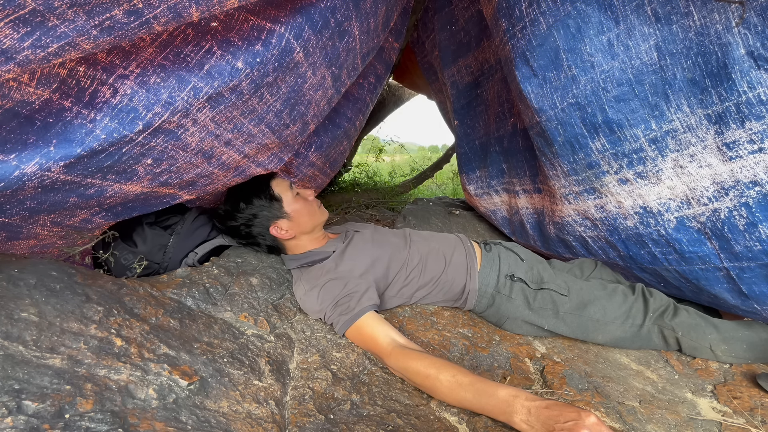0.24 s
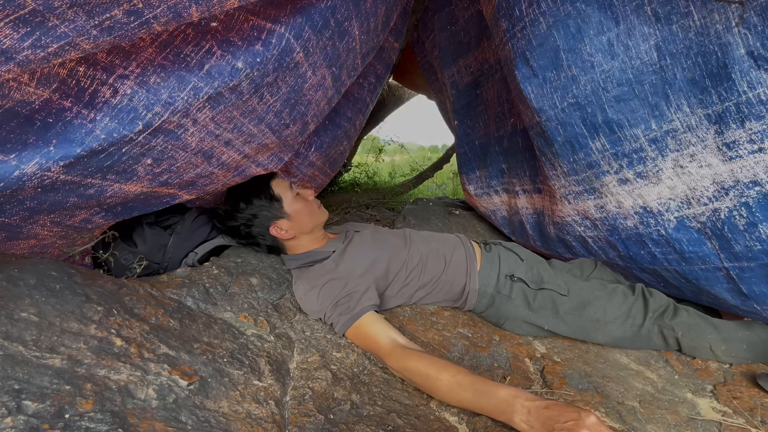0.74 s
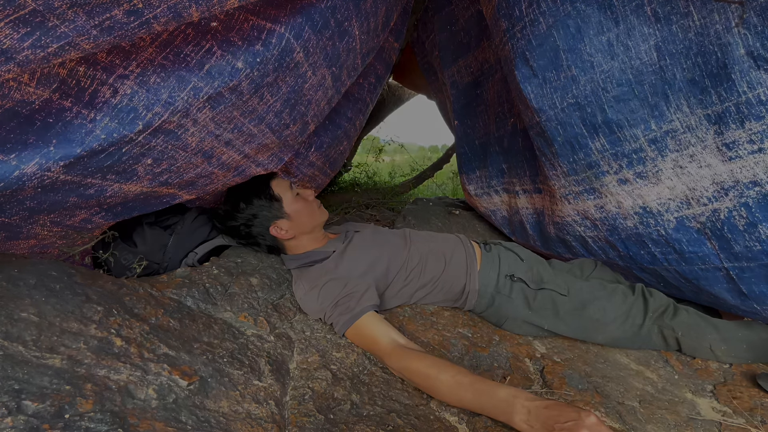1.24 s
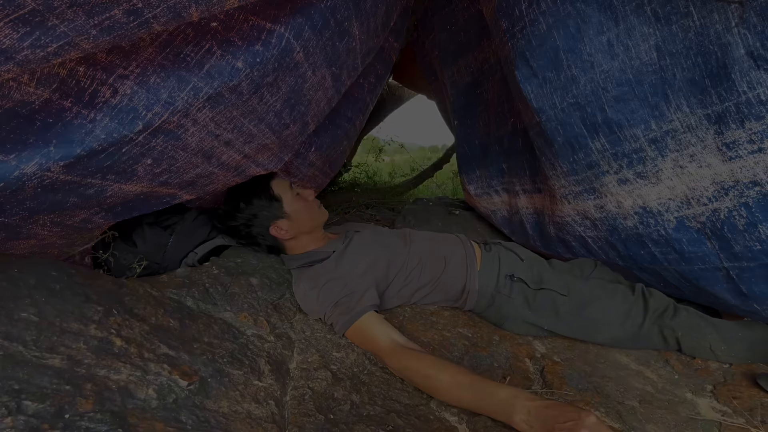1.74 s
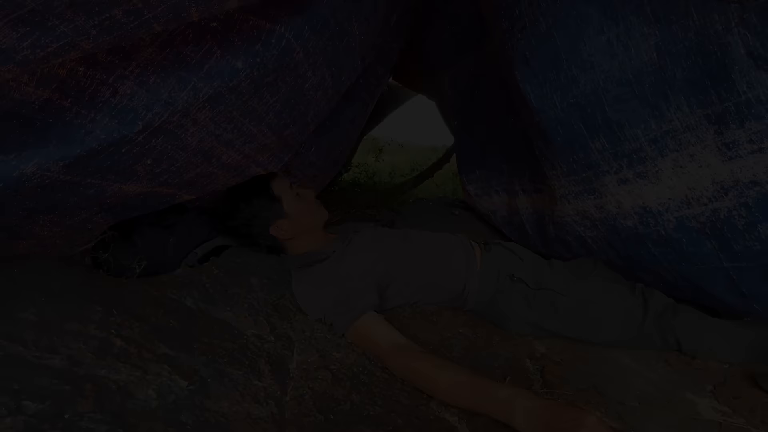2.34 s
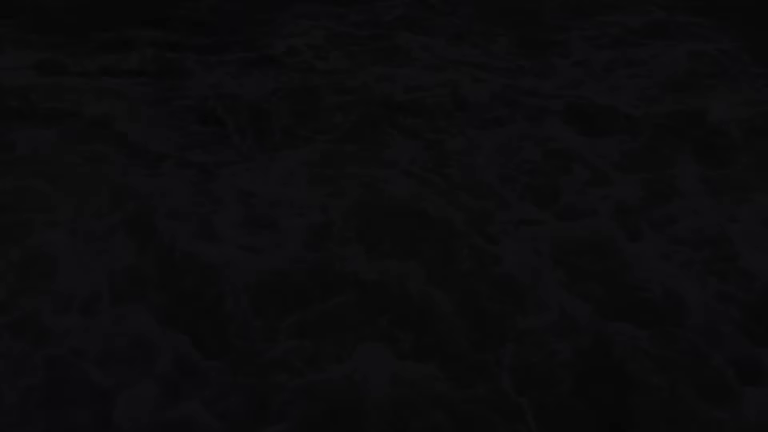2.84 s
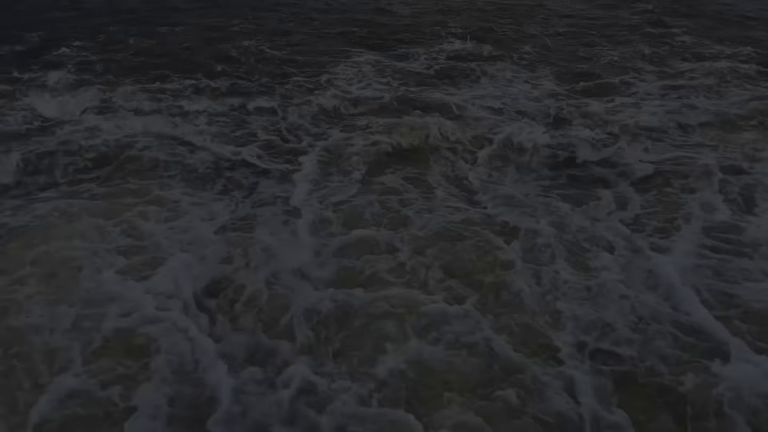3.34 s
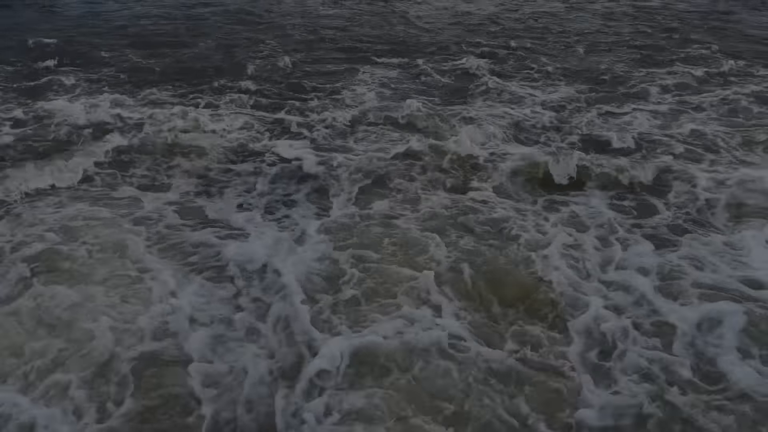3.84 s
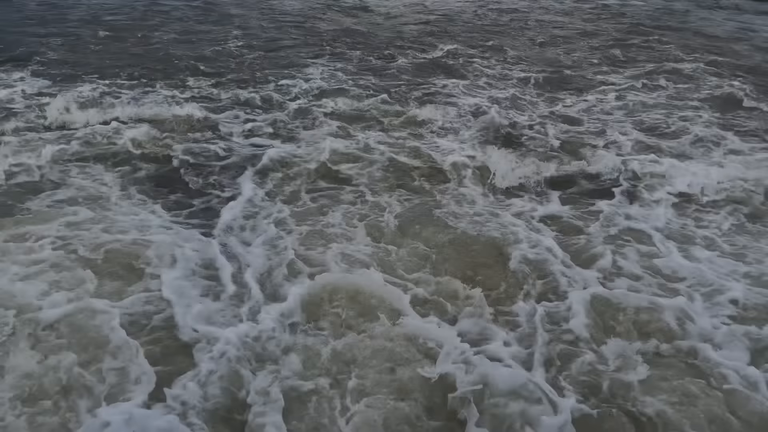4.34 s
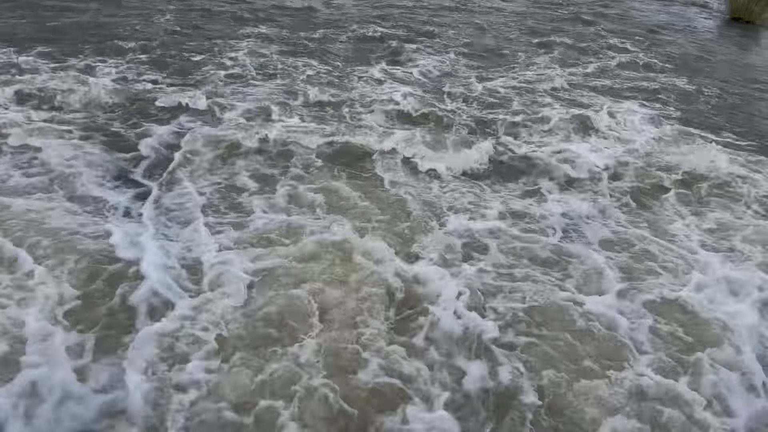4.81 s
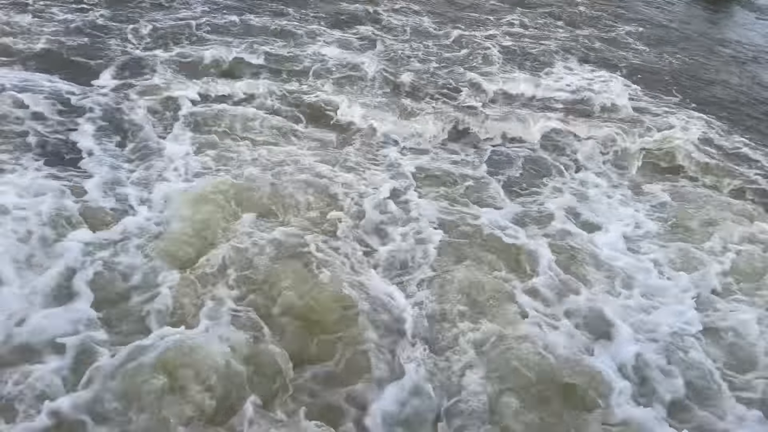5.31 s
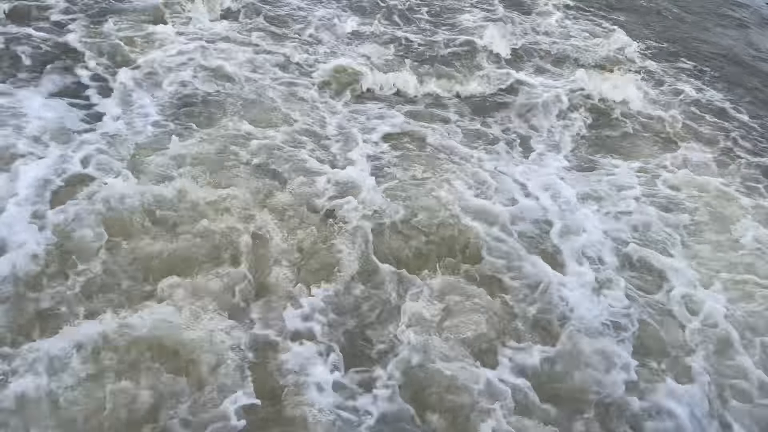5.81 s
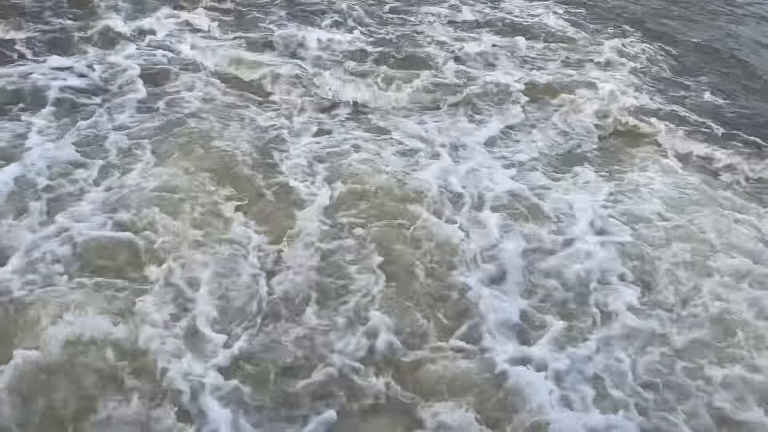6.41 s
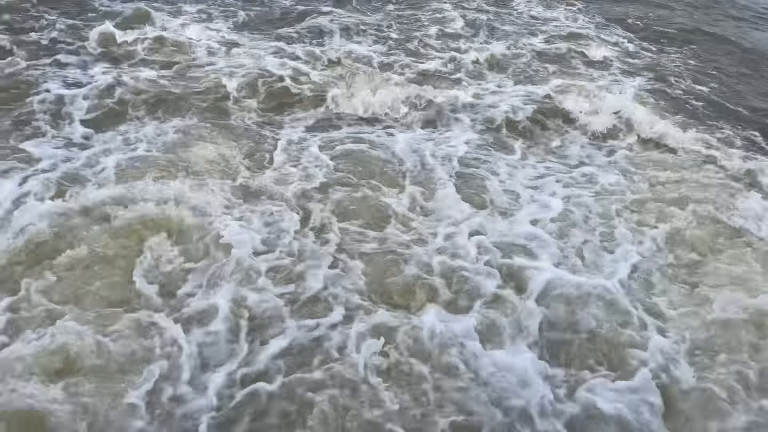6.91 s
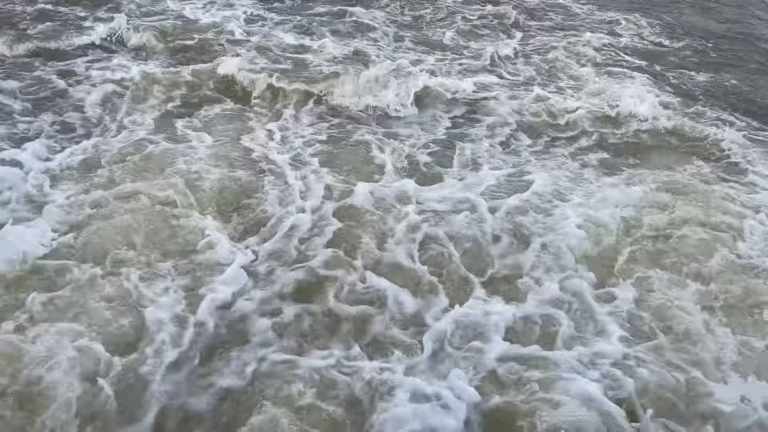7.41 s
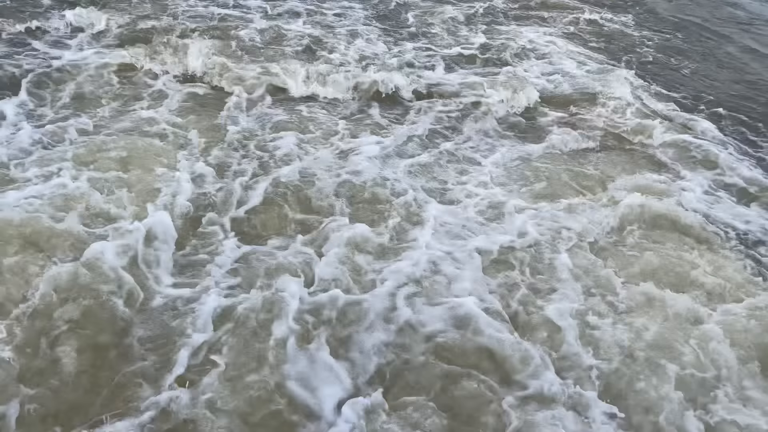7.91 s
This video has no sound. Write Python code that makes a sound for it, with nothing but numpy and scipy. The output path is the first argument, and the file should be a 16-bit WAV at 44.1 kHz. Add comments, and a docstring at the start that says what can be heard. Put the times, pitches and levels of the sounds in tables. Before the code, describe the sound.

A very quiet hillside holds a low, distant rumble, high buzzing crickets and a small bird chipping at an even pace, with a thin whistle and a few tiny leaf rustles. After almost three seconds it cuts abruptly to loud white water below a dam, rushing steadily with a deep churning roll, gurgles and fizzing spray. Both places are picked up in stereo by a phone.

```python
"""A low, far rumble on a still, warm hillside, with buzzing crickets, chipping and whistling birds and
rustling leaves. Then, all at once, the scene changes to the loud white water below a dam.
The crickets stridulate in narrow bands; the birds' gliding tones scatter off rocks and leaves.
The water sounds by bubble resonance: small bubbles fizz and gurgle, countless ones merge into the rush
of foam, and big air pockets throb. The two ports of a phone pick it up."""
import sys
import numpy as np
from scipy import signal
from scipy.fft import rfft, irfft
from scipy.io import wavfile
from scipy.ndimage import uniform_filter1d

SR = 44100
rng = np.random.default_rng(int(sys.argv[2]) if len(sys.argv) > 2 else 0)


def wav_record(signal):
    """Record a signal, one row per channel, as 16-bit PCM in the file named by sys.argv[1]."""
    frames = np.transpose(np.atleast_2d(signal))
    bounded = np.clip(frames, -1, 1)
    # unit amplitude maps onto the largest positive 16-bit level
    quanta = np.round(bounded * 32767).astype(np.int16)
    wavfile.write(sys.argv[1], SR, quanta)


N = 359415
TIME, BINS = np.arange(N) / SR, np.fft.rfftfreq(N, 1 / SR)
DAM_START_S = 2.6755


def undb(db):
    """Decibels to amplitude ratio."""
    return 10 ** (np.asarray(db) / 20)


def unit(x):
    """Normalisation to rms 1."""
    return x / np.sqrt(np.mean(x ** 2))


def over_time(table):
    """Linear interpolation of each column at every sample."""
    time_s, *columns = np.transpose(table)
    return [np.interp(TIME, time_s, column) for column in columns]


def over_pitch(table):
    """Interpolation of each column over log frequency, at every bin."""
    hz, *columns = np.transpose(table)
    return [np.interp(np.log(BINS + 1), np.log(hz), column) for column in columns]


def shape(x, gain):
    """Spectral filtering: one gain for each frequency bin."""
    return irfft(rfft(x) * gain, N)


def noise():
    """Two uncorrelated white noises."""
    return rng.standard_normal((2, N))


def resonance(hz, width_hz):
    """A steep resonance driven by noise; two channels, rms 1."""
    return unit(shape(noise(), 1 / (1 + 2j * (BINS - hz) / width_hz) ** 2))


def walk(rate_hz):
    """Random modulation: held steps smoothed twice, rms 1."""
    hold = max(int(SR / rate_hz), 1)
    steps = np.repeat(rng.standard_normal(N // hold + 1), hold)
    return unit(uniform_filter1d(uniform_filter1d(steps, hold), hold)[:N])


def swell(start_s, length_s):
    """A half-sine envelope."""
    return np.sin(np.pi * np.clip((TIME - start_s) / length_s, 0, 1))


def phase(hz):
    """Phase in radians, the integral of frequency."""
    return 2 * np.pi * np.cumsum(hz) / SR


def pan(left_db):
    """Left and right gains for a level difference."""
    return undb(np.array([[left_db], [-left_db]]) / 2)


def ports(pair, table):
    """Partial coherence: sound reaches two ports partly alike, shifted by the path round the phone."""
    coherence, lead_rad, left_db = over_pitch(table)
    coherence = np.clip(coherence, 0, 1)
    mid, side = rfft(pair) * np.sqrt([1 + coherence, 1 - coherence])
    left = (mid + side) * undb(left_db / 2)
    right = (mid - side) * undb(-left_db / 2) * np.exp(-1j * lead_rad)
    return unit(irfft([left, right], N))


def far_air():
    """Coloured noise: a distant, wavering rumble and a faint hiss of vegetation."""
    # spectrum of the hillside air: frequency_hz, relative_db
    spectrum = [(20, -36), (55, -2), (105, -0.5), (145, -5), (195, -1.6), (500, -8.5), (610, -12),
                (715, -21.5), (880, -24.5), (1700, -28.5), (3700, -39), (6000, -46.5), (7500, -39),
                (10150, -34), (11000, -67)]
    # the air at the two ports: frequency_hz, coherence, left_lead_rad, left_minus_right_db
    arrival = [(60, 0.86, 0.5, 0), (172, 0.89, -0.1, 0), (380, 0.22, .5, 2.5), (800, 0.16, 2, 3.5),
               (2000, 0.5, 2.5, 2), (5500, .1, 1, 6), (8300, .2, 5.5, 10), (8660, 0.89, -6.5, -4),
               (10040, 1, -2.5, 0)]
    # slow ebb of the rumble: time_s, level_db
    ebb = [(0.3, -44), (1.0, -44.0), (1.8, -45.5), (2.6, -44.5)]
    air = ports(shape(noise(), undb(over_pitch(spectrum)[0])), arrival)
    return air * undb(over_time(ebb)[0] + 0.24 * walk(5.25))


def tree_cricket(level_db=-80.5, fading_db=2.5):
    """Stridulation far away: a narrow wing resonance purrs, fading in and out."""
    return undb(level_db + fading_db * walk(14.3)) * resonance(hz=2600, width_hz=100)


def trilling_cricket(first_s=-0.02, every_s=.9, phrase_s=.42, level_db=-75.7):
    """Stridulation in even phrases: a far cricket's wing resonance swells and fades."""
    phrases = sum(swell(start_s, phrase_s) for start_s in np.arange(first_s, DAM_START_S, every_s))
    return undb(level_db) * phrases * pan(7) * resonance(hz=7120, width_hz=300)


def leaves():
    """Bursts of band-limited noise: dry leaves rustle briefly."""
    # rustles: start_s, length_s, pitch_hz, width_hz, level_db
    rustles = [(1.02, .045, 5700, 2200, -71.5), (1.27, .01, 4300, 2500, -71), (2.458, .012, 4850, 700, -68)]
    return pan(4) * sum(undb(db) * swell(start_s, length_s) * resonance(hz, width_hz)
                        for start_s, length_s, hz, width_hz, db in rustles)


def bush_cricket(pulse_hz=122, throb_hz=7.8, pulse_depth=0.24, throb_depth=0.12):
    """Amplitude modulation: two wing resonances rasp in quick pulses under a slower throb."""
    # the rasp builds, then eases: time_s, gain_db
    effort = [(0.2, -0.7), (0.85, 1), (1.3, 1.5), (1.74, 3), (1.92, 0), (2.6, -0.3)]
    pulses = 1 + pulse_depth * np.cos(phase(pulse_hz * (1 + 0.022 * walk(3.8))))
    throb = 1 + throb_depth * np.cos(phase(throb_hz * (1 + 0.14 * walk(2.1))))
    lower = undb(-68) * pan(10) * resonance(hz=8130, width_hz=340)
    upper = undb(-66) * pan(5) * resonance(hz=8540, width_hz=630)
    return (lower + upper) * undb(over_time(effort)[0]) * pulses * throb


def whistling_bird():
    """Frequency modulation: each thin, wavering whistle arches in pitch as it swells."""
    # whistles: start_s, length_s, end_pitch_hz, arch_hz, relative_db
    whistles = [(1.43, .34, 4390, 120, -67), (1.755, .07, 4020, 40, -67)]
    song = np.zeros(N)
    waver_db, waver_hz = 3 * walk(49.6), 35 * walk(250)
    for start_s, length_s, hz, arch_hz, db in whistles:
        arch = swell(start_s, length_s)
        song += undb(db + waver_db) * arch * np.sin(phase(hz + arch_hz * arch + waver_hz))
    return song


def chipping_bird(chip_s=0.038, sweep_hz=120, rasp_hz=130):
    """Fast random frequency modulation roughens a small bird's evenly paced, rising chips."""
    # chips: start_s, centre_pitch_hz, relative_db
    chips = [(.135, 4275, -62.5), (.318, 4260, -63.8), (.5, 4220, -64), (.687, 4275, -67),
             (.867, 4220, -66.5), (1.045, 4230, -64.5), (1.23, 4230, -65.5), (1.412, 4300, -62.5),
             (1.592, 4300, -64), (1.775, 4260, -66), (1.957, 4270, -68), (2.136, 4260, -65),
             (2.318, 4300, -68), (2.499, 4230, -66)]
    song, jitter_hz = np.zeros(N), rasp_hz * walk(700)
    for start_s, hz, db in chips:
        pitch_hz = hz + jitter_hz + sweep_hz * np.clip((TIME - start_s) / chip_s - 1 / 2, -1, 1)
        song += undb(db) * swell(start_s, chip_s) * np.sin(phase(pitch_hz))
    return song


def scattering(song, t60_s):
    """Scattering by rocks and leaves adds an exponentially decaying tail to the direct sound."""
    tail = noise()[:, :SR // 2] * undb(-60 * TIME[:SR // 2] / t60_s)
    tail /= np.linalg.norm(tail, axis=1, keepdims=True)
    return 0.5 * song + .56 * signal.fftconvolve(song[None], tail)[:, :N]


def air_pockets():
    """Bubble resonance: big pockets of air under the foam swell and ring low as their pitch slides."""
    # throbs: start_s, length_s, centre_pitch_hz, glide_hz_per_s, level_db
    throbs = [(2.682, .22, 112, 60, -21), (3.111, 0.23, 107, 110, -21.5), (4.2, .16, 113, 50, -23),
              (4.49, 0.18, 110, 40.5, -21.5), (4.44, .24, 75, -30, -22), (4.68, 0.13, 210, -0.5, -22),
              (4.782, 0.16, 84, -39.5, -23.5), (4.832, 0.14, 216, 0, -24.5), (4.933, .28, 116, 20, -21),
              (5.22, 0.21, 72, 0, -21.5), (5.431, .18, 106, -140, -20), (5.887, .15, 134, 40, -22),
              (6.56, .16, 160, 60, -20.5), (6.761, .16, 132, 60, -21.5), (7.028, 0.22, 130, -10, -21),
              (7.327, .23, 68, -30, -19), (7.732, 0.15, 112, 69.5, -22.5)]
    out, waver_hz = np.zeros(N), 3 * walk(30)
    for start_s, length_s, hz, glide, db in throbs:
        pitch_hz = hz + glide * np.clip(TIME - start_s - length_s / 2, -length_s, length_s) + waver_hz
        out += undb(db) * swell(start_s, length_s) * np.sin(phase(pitch_hz))
    return out


def bubbles(low_hz, high_hz, cycles, rise, spread_db, count):
    """Damped oscillation: single bubbles ring and glide up as they near the surface; a few stand out."""
    out = np.zeros((2, 2 * N))
    for when, smallness, luck, place in rng.random((count, 4)):
        hz = low_hz * (high_hz / low_hz) ** smallness
        age = np.linspace(0, 1, int(cycles * SR / hz) + 2)
        decay = np.exp(-np.log(100) * age)  # 40 dB over the bubble's life
        ring = decay * np.sin(2 * np.pi * cycles * age * (1 + rise * age / 2))
        strength = hz * undb(spread_db * luck ** 2)
        start, angle = int(when * N), 2 * np.pi * place
        out[:, start:start + len(age)] += strength * np.outer([np.cos(angle), np.sin(angle)], ring)
    return unit(out[:, :N])


def foam(heave_db, splash_db, flicker_db, bands=9):
    """Incoherent summation: countless bubbles merge into noise whose octave bands fluctuate."""
    centres_hz = np.geomspace(50, 12000, bands)
    band_position = np.interp(np.log(BINS + 1), np.log(centres_hz), np.arange(bands))
    source, heave, out = rfft(noise()), walk(16), 0
    splashes = [walk(28) for _ in range(bands + 2)]
    for k in range(bands):
        band = irfft(source * np.maximum(1 - abs(band_position - k), 0), N)
        # bands heave together, splash with their neighbours and flicker alone
        db = heave_db * heave + splash_db * unit(sum(splashes[k:k + 3])) + flicker_db * walk(22)
        out = out + undb(db) * band
    return unit(out)


def white_water(foam_db=1.5, eddy_wander_db=0.3, crossover_hz=330):
    """Turbulence traps air: foam, gurgles and spray swell with the flow while eddies roll underneath."""
    # rush of the flow: time_s, relative_db
    flow = [(2.7, -23), (3.25, -23.3), (3.7, -24), (4.15, -23), (4.55, -22), (5.0, -22), (5.55, -23.5),
            (5.95, -23), (6.33, -22), (6.55, -23), (7.1, -23.5), (7.75, -23), (7.93, -22), (8.15, -23.1)]
    # deep roll of the eddies: time_s, level_db
    roll = [(2.7, -22), (3.2, -22.5), (3.45, -23.5), (4.25, -23), (4.9, -22.0), (5.6, -22), (6.1, -21),
            (6.35, -21.5), (6.55, -22.5), (6.9, -21.5), (7.4, -22.5), (7.9, -21.6), (8.15, -23.5)]
    # colour of the water: frequency_hz, gain_db
    spectrum = [(22, -27), (33, -9.5), (70, 0.5), (105, -1), (130, -0.6), (160, -3.5), (205, -2.5),
                (265, -4.8), (410, -10.5), (750, -13), (1700, -22), (2800, -21), (4100, -25), (4750, -24.5),
                (5300, -25.5), (7500, -23.5), (9600, -19.5), (10500, -23), (11700, -33), (12900, -42),
                (14000, -66)]
    # the water at the two ports: frequency_hz, coherence, left_lead_rad, left_minus_right_db
    arrival = [(60, .55, 0, .1), (110, .76, 0, .1), (200, .9, -.05, .2), (400, .86, .16, .1),
               (600, .83, .43, 1.2), (950, .69, .43, 4.5), (1300, .81, .14, 1.3), (1630, .92, .1, .8),
               (2000, .73, .47, .5), (2800, .17, 1.1, 1.5), (3210, .22, 4, 1.5), (3640, .1, 6.5, -.5),
               (4070, .5, 7.5, 0), (4400, .5, 8, -1), (5000, .65, 10.5, -2.2), (5650, .92, 12.45, .4),
               (6400, .96, 12.5, 0), (7050, .84, 12.6, -.5), (7500, .6, 13.6, -2), (8060, .72, 16, 2),
               (8490, .96, 15.5, -1), (8950, 1, 15.68, -.2), (9550, 1, 15.72, -.2), (9850, .91, 16.05, 1.5),
               (11230, .55, 18, 0), (11800, 1, 18.8, 0)]
    (flow_db,), (roll_db,) = over_time(flow), over_time(roll)
    gurgle = bubbles(low_hz=331, high_hz=2586, cycles=23, rise=0.16, spread_db=7.5, count=2500)
    spray = bubbles(low_hz=1810, high_hz=11140, cycles=2.6, rise=.1, spread_db=4, count=9000)
    froth = foam(heave_db=0.19, splash_db=0.45, flicker_db=0.63)
    churn = froth + undb(-16.5) * gurgle + undb(-11) * spray
    water = ports(shape(churn, undb(over_pitch(spectrum)[0])), arrival)
    deep = shape(water, 1 / (1 + (BINS / crossover_hz) ** 4))
    rush = undb(foam_db + flow_db) * unit(water - deep)
    eddies = undb(roll_db + eddy_wander_db * walk(5)) * unit(deep)
    return rush + eddies


def scene():
    """Superposition of the sources in each place: the hillside, then suddenly the dam."""
    buzz = bush_cricket() + trilling_cricket()
    birds = pan(4) * scattering(chipping_bird() + whistling_bird(), t60_s=.32)
    hillside = far_air() + buzz + tree_cricket() + birds + leaves()
    dam = white_water() + air_pockets()
    return np.where(TIME < DAM_START_S, hillside, dam)


def record(dry):
    """Band limiting: the phone's steep low-pass filter cuts the top treble."""
    cutoff_hz = 14000
    return signal.sosfilt(signal.ellip(8, .2, 70, cutoff_hz, fs=SR, output="sos"), dry)


dry = scene()
out = record(dry)
wav_record(out)
```